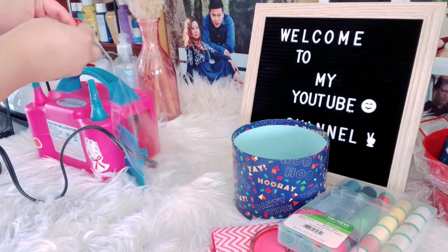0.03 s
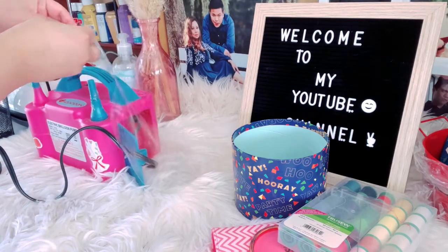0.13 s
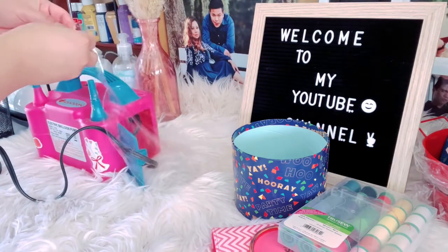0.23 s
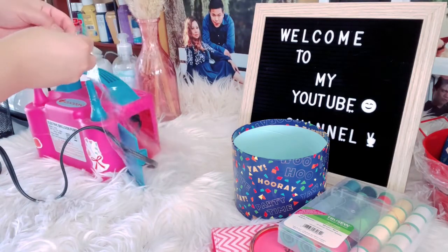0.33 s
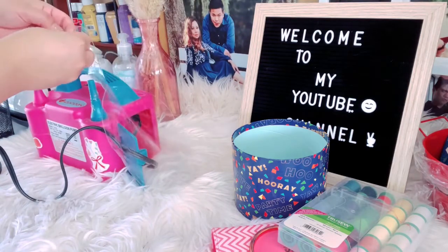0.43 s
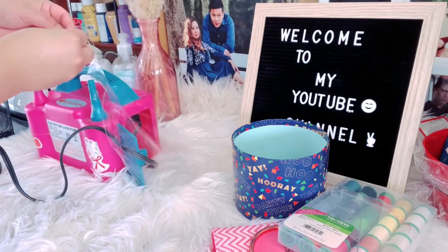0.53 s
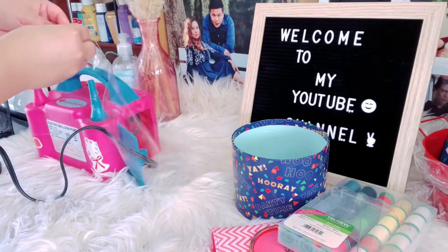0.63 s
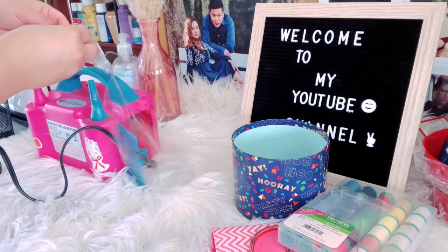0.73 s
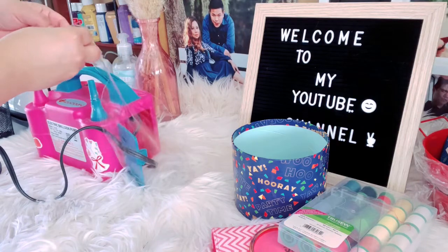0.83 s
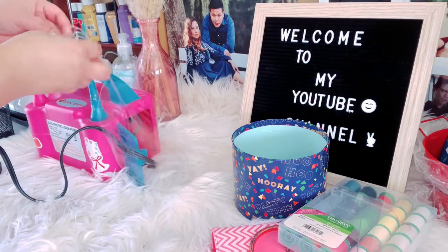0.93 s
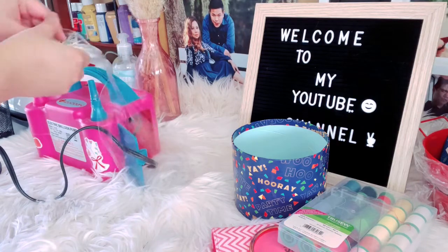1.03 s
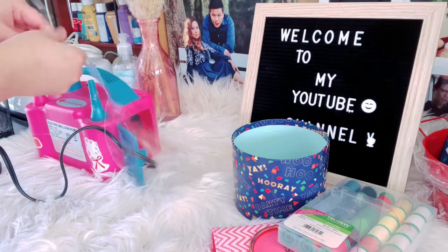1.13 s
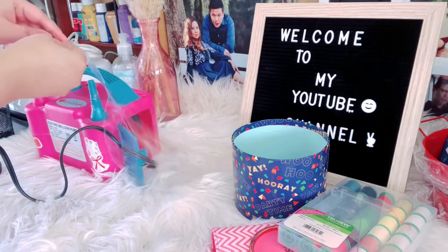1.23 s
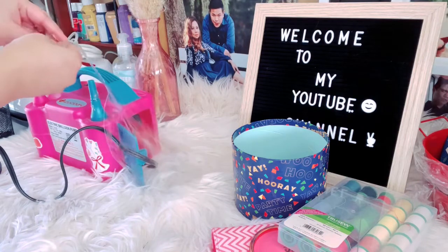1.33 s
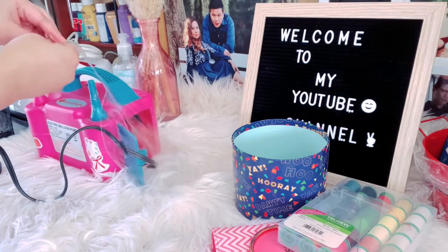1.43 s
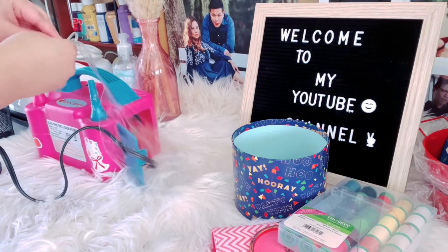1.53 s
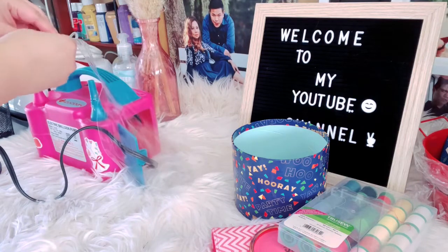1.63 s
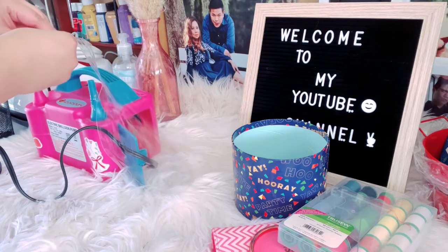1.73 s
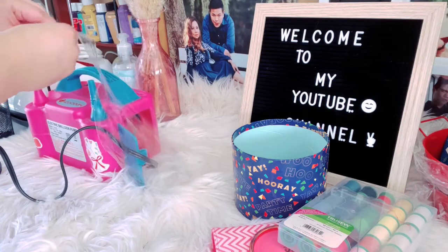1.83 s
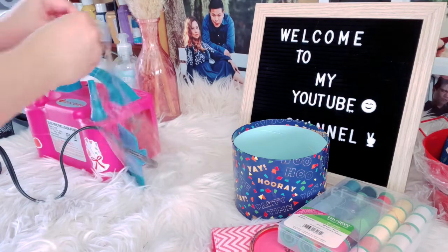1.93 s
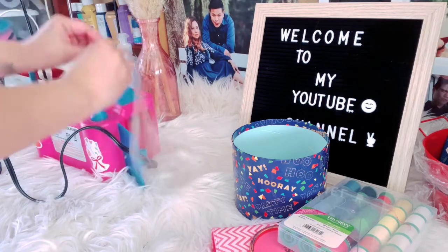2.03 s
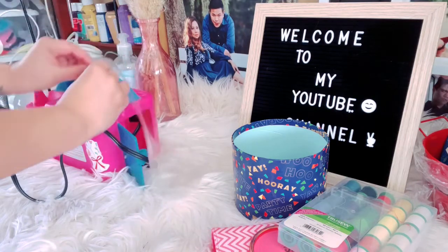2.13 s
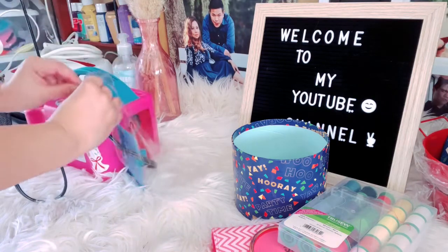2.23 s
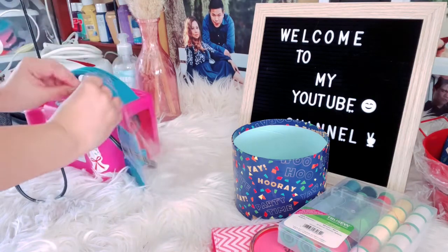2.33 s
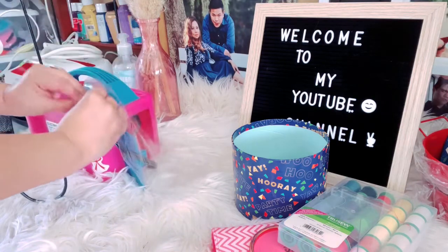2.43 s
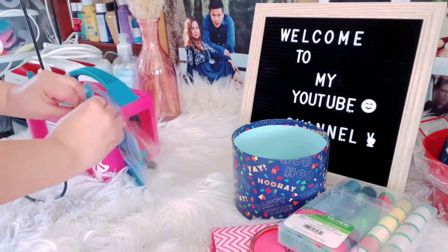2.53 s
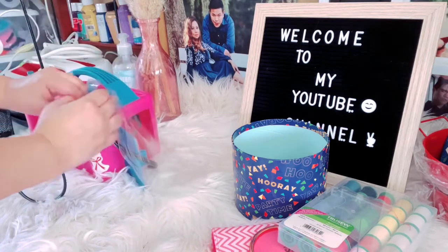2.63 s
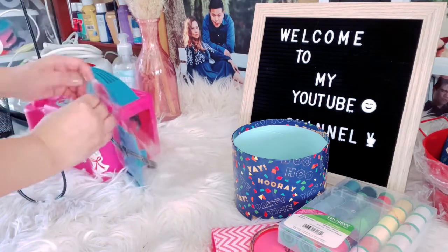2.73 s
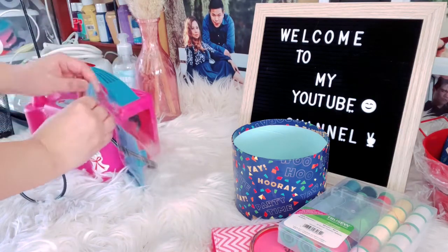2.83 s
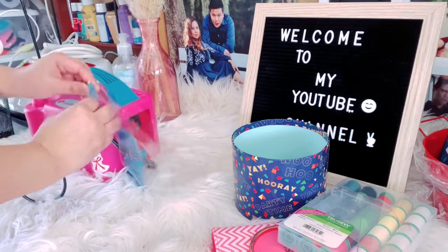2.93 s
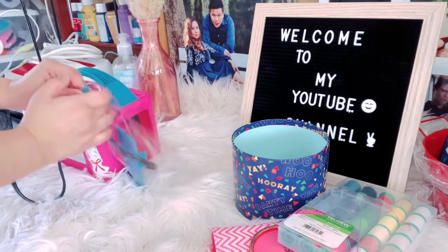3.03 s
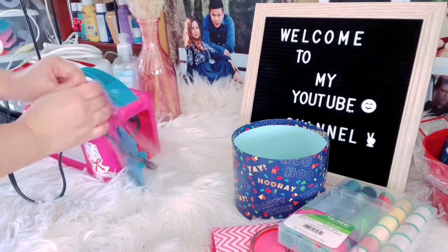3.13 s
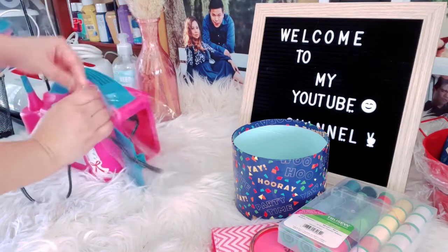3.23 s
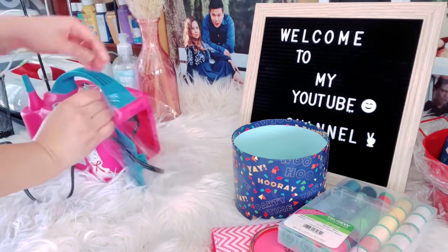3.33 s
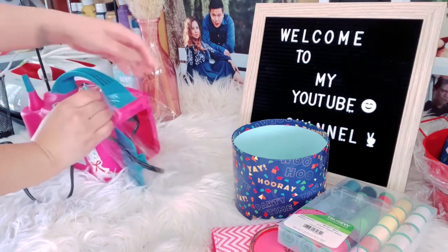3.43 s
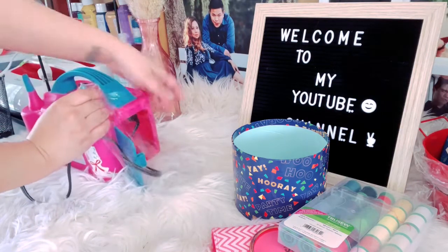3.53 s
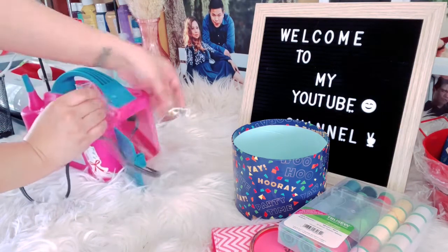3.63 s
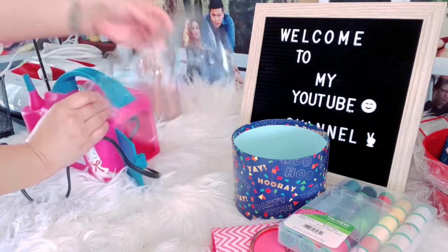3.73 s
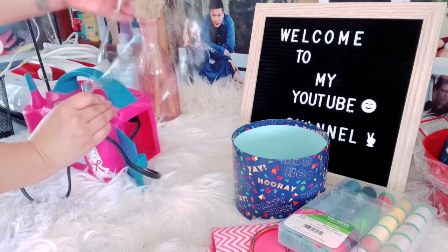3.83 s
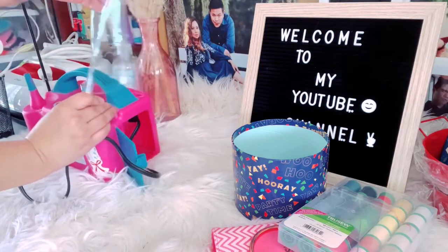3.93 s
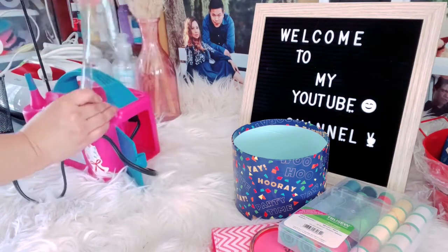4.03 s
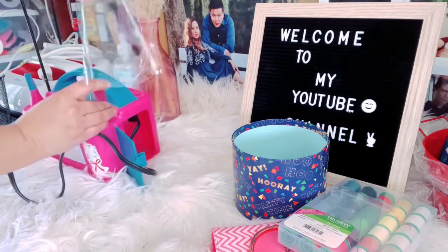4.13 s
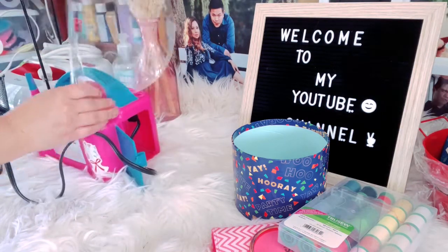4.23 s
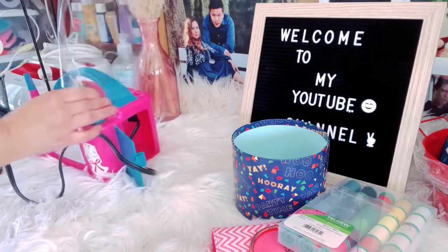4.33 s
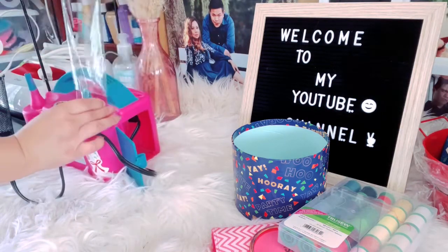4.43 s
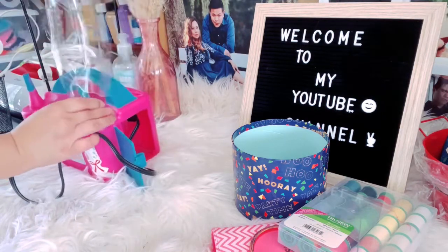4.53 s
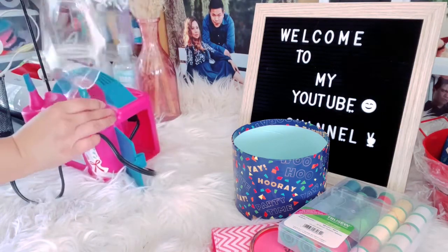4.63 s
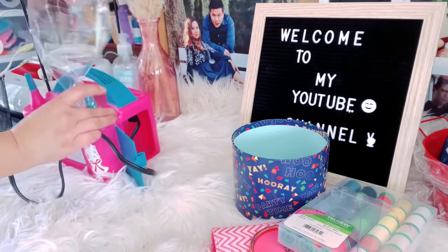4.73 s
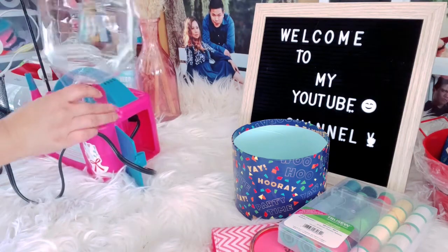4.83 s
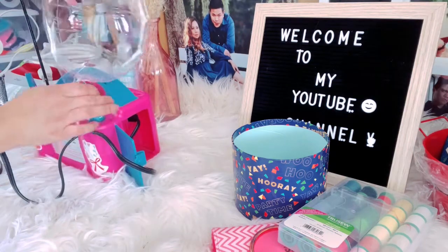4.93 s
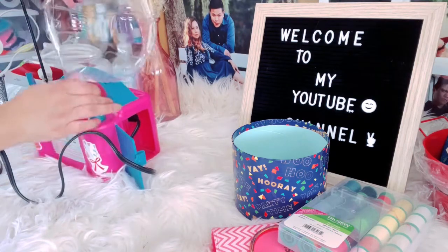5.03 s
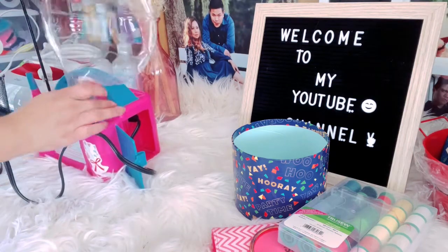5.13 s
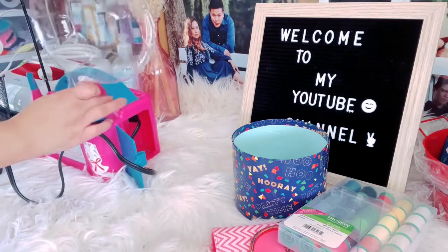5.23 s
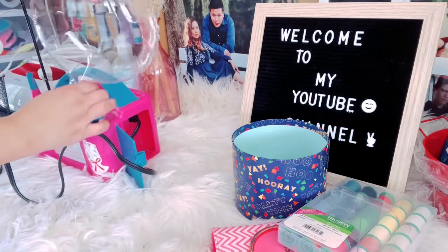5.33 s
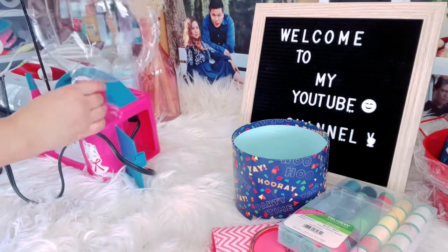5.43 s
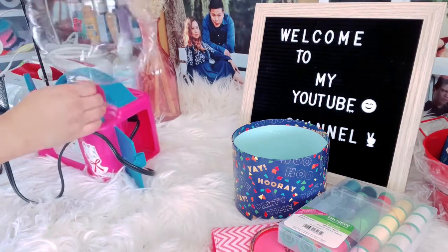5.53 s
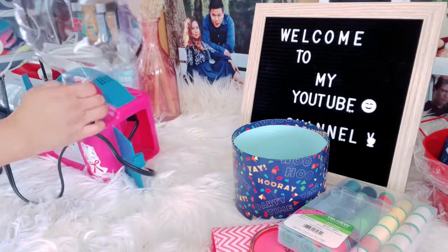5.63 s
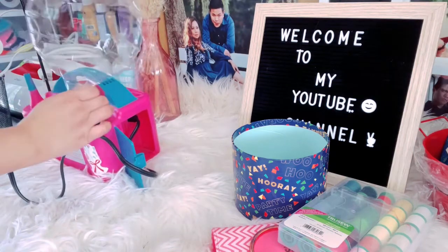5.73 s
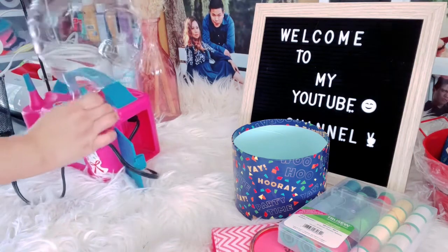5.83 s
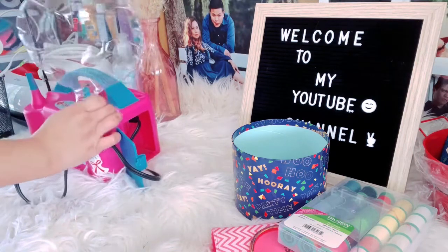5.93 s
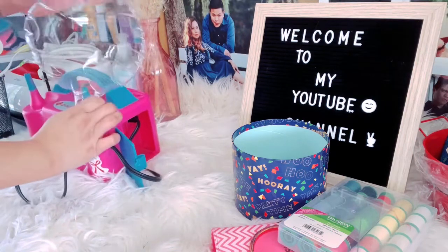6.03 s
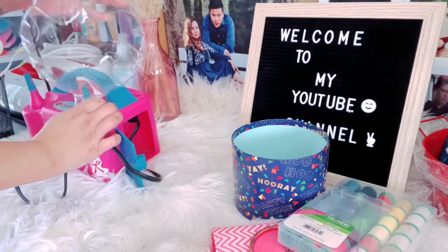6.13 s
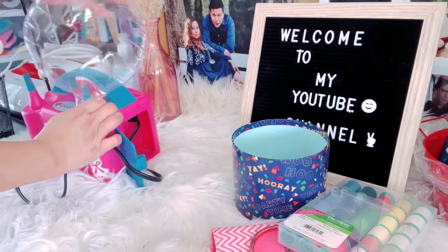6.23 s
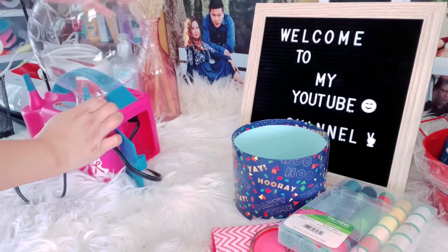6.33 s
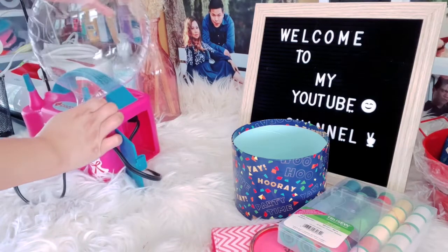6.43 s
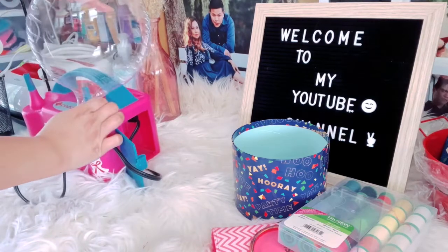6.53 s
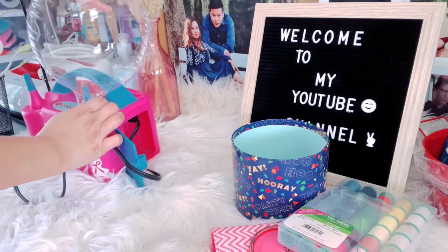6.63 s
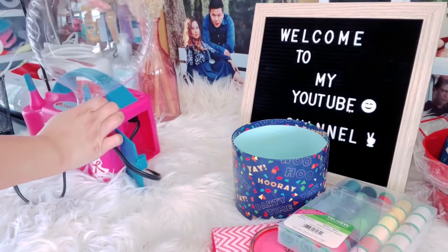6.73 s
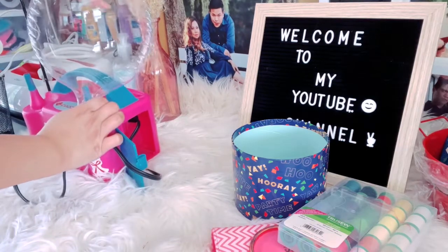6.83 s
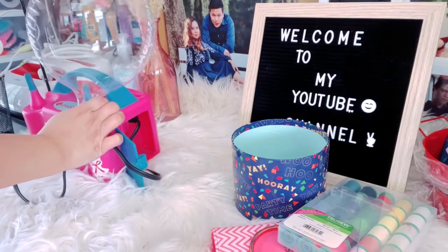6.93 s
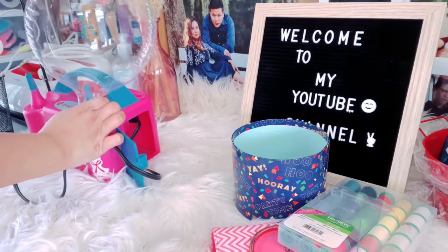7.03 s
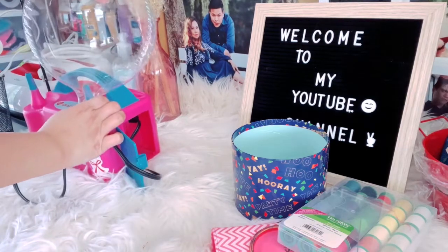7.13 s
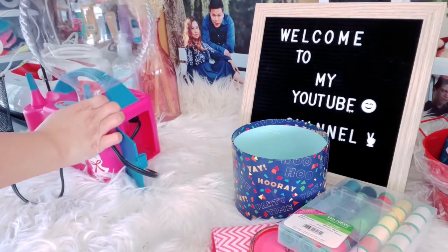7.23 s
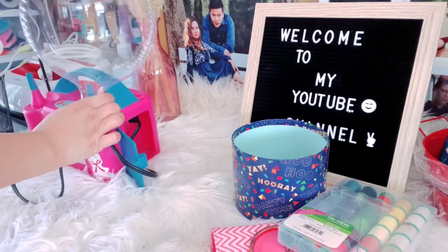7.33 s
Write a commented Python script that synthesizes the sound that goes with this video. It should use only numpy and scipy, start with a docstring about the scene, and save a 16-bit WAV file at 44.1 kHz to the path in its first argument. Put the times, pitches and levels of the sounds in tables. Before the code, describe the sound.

A small electric balloon pump in a furnished room, heard close in stereo with short reverberation. From 0 to about 3.2 s it is quiet: a dry, rustling fan whirr falls in pitch and fades over a low air murmur. Plastic film gives a knock at 0.3 s, a few ticks and a bright crack at 1.8, then dense crinkling and rubbing from 2.1, busiest around 2.4 to 2.7. At 3.25 a hard switch clack launches the motor: a whine sweeps up steeply with electrical buzz, whistling blades and roaring, hissing air, while the limp balloon flaps until about 4. Released at 3.6, it sags; short presses at 3.9 and 4.5 push it up again, with extra hiss leaking afterwards. From 4.7 whine and roar sink steadily. At 6.15 a long press revs it up to its highest, loudest rush, released around 7.2 as it begins falling.

```python
"""A falling whirr is heard first: the fan of a small electric balloon pump running out on a table in a furnished room.
Fingers crinkle a clear plastic balloon on the nozzle, its film snapping and rubbing, close to a two-port microphone.
Four presses then drive the motor: torque under current spins the rotor up, fan drag and friction slow it in between.
Whine, blade whistle and commutator tones are sines locked to the speed; air roars through the housing's resonances
and hisses past the balloon's neck as noise that grows as a power of the speed."""
import sys
import numpy as np
from scipy import signal
from scipy.fft import rfft, irfft, next_fast_len
from scipy.io import wavfile
from scipy.ndimage import uniform_filter1d

SR = 44100
rng = np.random.default_rng(int(sys.argv[2]) if len(sys.argv) > 2 else 0)


def master(y):
    """Save y as 16-bit WAV."""
    cut = np.clip(np.atleast_2d(y).T, -1, 1)
    pcm = np.round(cut * 32767)  # scale
    wavfile.write(sys.argv[1], SR, pcm.astype(np.int16))


N = 325458
TIME = np.arange(N) / SR
BINS = np.fft.rfftfreq(1024, 1 / SR)

# The switch is held down: (start t/s, stop t/s, acceleration by the motor at stall/turns per s^2)
PRESSES = [(3.26, 3.635, 10221), (3.87, 4.015, 10197), (4.502, 4.665, 10014), (6.162, 7.207, 10470)]
START_SPEED = 88  # turns/s left from an earlier run
HALF_CURRENT_SPEED = 226  # turns/s at which the current has halved
FRICTION = 65  # turns/s lost each second in brushes and bearings
WORK_SPEED, FAN_DRAG, DRAG_POWER = 500, 245, 2.61  # turns/s, its fan loss in turns/s each second, exponent

# The rotor's once-a-turn whine as the case radiates it: (f/Hz, level/dB)
WHINE = [(150, -46), (265, -34.5), (320, -38.5), (400, -33.5), (450, -31), (485, -30.5), (503, -34),
         (522, -29.5), (570, -33.5), (588, -33), (612, -29), (633, -31.5), (645, -32.5), (658, -26),
         (682, -21)]
# Brief dips of the whine: (start t/s, stop t/s, level change/dB)
WHINE_DIPS = [(4.09, 4.28, -4), (4.57, 4.92, -11), (6.263, 6.59, -2)]
# The rotor's third harmonic as it crosses the case's main resonance: (f/Hz, level/dB)
THIRD_HARMONIC = [(600, -46), (780, -44.5), (930, -43), (1020, -79), (1200, -76), (1330, -55),
                  (1480, -52.5), (2000, -66)]
# Whistle of the seven fan blades as the vents pass it: (f/Hz, level/dB)
BLADES = [(400, -86), (480, -74), (508, -61), (545, -65), (580, -59), (620, -59), (1830, -65), (1940, -56),
          (2010, -52), (2070, -63), (2125, -52.5), (2200, -49), (2300, -61), (2420, -54), (2520, -63),
          (2620, -58), (2720, -68), (2900, -60), (3020, -40), (3200, -43), (3400, -50), (3550, -48),
          (3760, -41.5), (4000, -47.5), (4300, -46.5), (4550, -46), (4750, -44.5)]
BLADE_JITTER = .006  # share by which turbulence shakes the whistle's pitch at working speed
# Commutator tones at stall current, before the sparking level: (multiple of the speed, level/dB)
BRUSH_TONES = [(12, -34), (24, -40), (36, -51), (48, -56)]
# Radiation of the commutator tones by the plastic case: (f/Hz, relative level/dB)
CASE_RADIATION = [(700, -10), (1300, -17), (2000, -3), (2400, -20), (3050, 0), (3400, -10), (4050, 6.5),
                  (4330, -4), (4560, 2), (4900, -11), (5300, -7), (5550, 4), (5750, 5.5), (5950, -6),
                  (6500, -20), (14000, -26)]
HUM_HZ, HUM_DB = 120, -28  # twice the mains frequency; level at stall current

# Laws of air noise: (level/dB at working speed, growth/dB per tenfold speed)
ROAR_LAW = (-29, 36.2)
RUMBLE_LAW = (-40, 26.5)
JET_LAW = (-41, 56)
SPRAY_LAW = (-40, 55.3)
NECK_LAW = (-56, 41)
NOZZLE_LAW = (-51, 38)
# Air resonances in the housing: (f/Hz, width/Hz, level/dB)
HOUSING = [(419, 52, -4), (542.6, 39, 6), (675, 180, -3), (733, 52, -1), (977, 60, 0), (1048.6, 36, -3.5),
           (1392, 27, -13.5)]
# Vent resonances, over the plain hiss: (f/Hz, width/Hz, level/dB)
VENTS = [(1960, 120, -1.5), (2254, 41, -1.5), (3054, 70, 4), (3400, 240, -3)]
# Nozzle tube resonances, which stand out once the jet slackens: (f/Hz, width/Hz, level/dB)
NOZZLE = [(5000, 92, -0.5), (6700, 240, -4.5)]
# Resonances of the balloon's neck: (f/Hz, width/Hz, level/dB)
NECK = [(4650, 1000, 5.5), (5240, 680, 10.5), (6260, 350, -22)]
# Spectral shapes of the rumble, the jet and its fine spray: (f/Hz, relative level/dB)
RUMBLE = [(20, -32), (45, -39), (78, -1), (200, 6.5), (400, -1), (600, -66), (1200, -58), (4000, -70)]
JET = [(300, -2.5), (1000, 1), (2700, 4), (3400, 5.5), (6000, 2), (8000, -3.5), (10000, -44), (14000, -25),
       (15000, -48)]
SPRAY = [(3000, -48), (6000, 6), (8500, 5.5), (12000, 5), (13000, 10.5), (14200, 5), (14700, -20),
         (15000, -60)]
# Air flow through the fan, lowered as the filling balloon pushes back: (t/s, level/dB)
THROUGHFLOW = [(3.4, 3.5), (4.03, 2.5), (4.7, -1.5), (6.7, -0.5), (7.2, -6)]
# The grip changes and more or less air escapes past the neck:
# (start t/s, stop t/s, ramp/s, extra jet level/dB, extra spray level/dB, extra neck level/dB)
LEAKS = [(3.284, 3.538, .02, 5.5, 3, 13), (4.172, 4.415, 0.036, 6.5, 5, 18),
         (4.558, 4.854, 0.068, 2.5, 5, 7), (4.837, 5.183, 0.18, 4, 2, 6),
         (6.164, 6.404, 0.09, -0.5, -1, -11), (7.174, 7.4, 0.017, 0.5, 4, 9)]
# The limp balloon flaps open and puffs the air in the housing: (t/s, level/dB)
FLAPS = [(3.672, -17), (3.724, -22), (3.772, -16), (3.96, -15), (4.013, -26)]
FLAP_S = 0.0055  # rise constant of one puff
# The slack balloon buffets the air until it has unfolded
BUFFET_START_S, BUFFET_STOP_S, BUFFET_DB = 3.36, 4.05, -41.5
BUFFET_HZ, BUFFET_WIDTH_HZ = 98, 22

# Spectral shape of the bearings' rustle: (f/Hz, relative level/dB)
RUSTLE = [(60, -10), (150, 4), (320, -2.5), (600, 2.5), (1000, -9), (1600, -14.5), (3500, -20), (3900, -26),
          (4300, -19), (9000, -21.5), (12500, -18), (15000, -25)]
# Resonances rung by the dry bearings until the rotor has almost stopped: (f/Hz, width/Hz, level/dB)
BEARING_RINGS = [(1320, 150, 2), (2100, 250, 1), (2820, 400, 0)]
# Law of the bearing rings: (level/dB at the starting speed, power of the speed)
BEARING_LAW = (-75, 0.74)
# Commutator bars sliding without current: (multiple of the speed, level/dB before band-pass and slowing)
DRY_TONES = [(12, -78), (24, -81), (36, -84), (48, -84), (60, -85), (72, -84), (84, -86), (96, -85),
             (120, -85)]
SING_HZ, SING_WIDTH_HZ, SING_DB = 3830, 110, -69  # the case sings while the rotor is still fast

# Crinkles of the film, before the common gains in film():
# (t/s, knock level/dB, knock f/Hz, crack level/dB, crack f/Hz)
CRINKLES = [(0.304, -52, 900, -64, 4900), (1.116, -65, 1300, -71, 2400), (1.165, -74, 1300, -76, 5500),
            (1.812, -72, 1500, -51.5, 5400), (2.104, -69, 1300, -77, 3600), (2.174, -61, 1160, -73, 3600),
            (2.213, -65, 1090, -64, 3700), (2.384, -59.5, 1040, -58.5, 3630),
            (2.43, -58, 1720, -50.5, 3760), (2.478, -65, 1100, -59, 3300), (2.518, -55.5, 560, -62, 4500),
            (2.532, -65, 850, -68, 5400), (2.581, -61, 1700, -60, 2700), (2.607, -59, 1130, -55.5, 5900),
            (2.649, -52, 890, -61, 2100), (2.661, -66, 1310, -64, 4200), (2.681, -56, 900, -57, 2900),
            (2.719, -57, 1180, -60, 2200), (2.845, -75, 1410, -67, 4830), (2.918, -64, 1420, -65, 3500),
            (2.962, -66, 1700, -56.5, 3020), (3.004, -59.5, 1120, -76, 5500), (3.14, -82, 1400, -66, 5000),
            (3.174, -64, 1510, -52, 4470), (3.24, -53, 1500, -51, 3500)]
# Short strokes of the film rubbing on the nozzle: (start t/s, stop t/s, level/dB)
RUBS = [(0.2, 0.285, -68.5), (1.112, 1.177, -71), (1.45, 1.482, -74), (2.067, 2.157, -71),
        (2.18, 2.255, -68.5), (2.4, 2.495, -68), (2.51, 2.8, -72), (2.95, 3.033, -67.5), (3.064, 3.18, -70),
        (3.193, 3.267, -63.5)]
GRAINS_PER_S, CLUMP_DB, CLUMP_HZ = 3500, 4.5, 35  # tiny slips of the film; depth and rate of their clumping
# Knocks of the switch and the starting rotor: (t/s, level/dB)
SNAPS = [(3.242, -39), (3.254, -22), (3.262, -33), (6.165, -42)]
# Modes of the case: (f/Hz, level/dB, 60 dB decay time/s)
CASE_MODES = [(775, 5.5, 0.021), (800, -8, 0.02), (1120, -10, 0.027), (1970, -26, 0.02)]

# Reverberation time of the room: (f/Hz, 60 dB decay time/s)
ROOM_T60 = [(100, 0.098), (1000, 0.32), (5000, 0.29), (15000, 0.13)]
# Spectral shape of the room's murmur of air: (f/Hz, relative level/dB)
ROOM_TONE = [(25, -7.5), (135, -3.5), (205, -6.5), (270, -2), (550, -13), (720, -16.5), (1300, -35.5),
             (3000, -42), (15000, -53)]
ROOM_TONE_DB = -60
# The two microphone ports: (f/Hz, likeness 0-1, left lead/rad, left minus right level/dB)
PORTS = [(101, 0.95, 0.084, 1.5), (280, 0.84, 0.091, 2.5), (583, 0.61, 1.45, 3), (755, 0.12, 0.89, 4),
         (1150, 0.86, 0.33, 5.5), (1380, 0.63, 0.31, 0), (2060, 0.2, 0.94, -0.5), (2720, 0.41, 0.78, -1.5),
         (4500, 0, 0.73, -3), (8760, 0.64, 3.72, -.5), (11900, 0.93, 6.6, 0), (11770, 0.85, 46.4, -0.5),
         (13950, 0.6, 2.2, 0)]
EDGE_HZ = 15700  # upper band limit


def rotor():
    """Angular momentum balance: torque goes with current squared; fan drag and friction oppose it (turns/s)."""
    pull = sum(strength * gate(start, stop, ramp_s=.002) for start, stop, strength in PRESSES)
    step, speed, speeds = 64, START_SPEED, []
    for torque in pull[::step].tolist():
        drag = FRICTION + FAN_DRAG * (speed / WORK_SPEED) ** DRAG_POWER
        drive = torque / (1 + speed / HALF_CURRENT_SPEED) ** 2
        speed = max(speed + (drive - drag) * step / SR, 0)
        speeds.append(speed)
    return np.interp(TIME, TIME[::step], speeds)


def motor(speed, first_start_db=-1, restart_db=-9.0):
    """Rotational sources: whine and whistle are harmonics of the speed; hum and brush tones follow the current."""
    speed = speed * (1 + 0.001 * wander(10.9))
    flow, hum = current(speed)
    # the brushes sing loudest on a start from rest
    spark_db = np.where(TIME < PRESSES[1][0], first_start_db, restart_db)
    pulsing = 1 + 0.32 * np.sin(2 * np.pi * HUM_HZ * TIME)  # twice a mains cycle
    sparking = flow * amp(spark_db) * pulsing
    near = shelves(blade_whistle(speed, flow) + brush_tones(speed) * sparking, echo_db=-6)
    return running() * rotor_whine(speed) + near + hum


def rotor_whine(speed):
    """Once-per-turn excitation and its third harmonic, weighted by the case's radiation at each pitch."""
    dips = sum(db * gate(start, stop, ramp_s=0.051) for start, stop, db in WHINE_DIPS)
    whine = amp(read(WHINE, speed) + dips) * tone(speed, rough=0.23, flutter_hz=30.7, lean_db=6.0)
    hz = 3 * speed
    third = amp(read(THIRD_HARMONIC, hz)) * tone(hz, rough=0.25, flutter_hz=30, lean_db=-1.5)
    return whine + third


def blade_whistle(speed, flow):
    """Blade-passing tone: seven pulses a turn, with turbulence shaking the pitch in proportion to speed."""
    hz = 7 * speed
    shaken = hz * (1 + BLADE_JITTER * speed / WORK_SPEED * wander(126))
    rough = .55 * np.clip(speed / WORK_SPEED, .6, 1)
    blades = amp(read(BLADES, hz)) * tone(shaken, rough=rough, flutter_hz=32, lean_db=1)
    blades = blades * np.clip(speed / 60, 0, 1) ** 2  # silent near rest
    return blades * amp(-25 * flow * (hz < 2700))  # the low whistle thins while the rotor races up


def brush_tones(speed, fizz_db=-43):
    """Commutation: brushes crossing the bars excite multiples of the speed, and sparks fizz around them."""
    brushes = amp(fizz_db) * unit(band(rng.standard_normal((2, N)), 900, 3500))
    for order, db in BRUSH_TONES:
        hz = round(order) * speed
        gain = amp(db + read(CASE_RADIATION, hz))
        brushes = brushes + gain * tone(hz, rough=.55, flutter_hz=200, lean_db=-2)
    return brushes


def current(speed, hum_power=1.56):
    """Back-EMF: the relative current falls as the rotor gains speed; also returns the hum the current makes."""
    held = sum(gate(start, stop, ramp_s=0.032) for start, stop, _ in PRESSES)
    draw = 1 / (1 + speed / HALF_CURRENT_SPEED)
    hum = tone(np.full(N, HUM_HZ), rough=.15, flutter_hz=20, lean_db=2)
    return held * draw, amp(HUM_DB) * held * draw ** hum_power * hum


def running(open_s=0.062):
    """Onset gate: opens as the motor first starts and stays open."""
    return np.clip((TIME - PRESSES[0][0]) / open_s, 0, 1)


def shelves(x, echo_db=-1, fall_s=0.011):
    """Early reflection: a dense cluster of echoes from things close by breaks up and smears gliding tones."""
    t = np.arange(SR // 16) / SR
    hits = rng.random((2, len(t))) < 1500 / SR
    taps = rng.standard_normal((2, len(t))) * hits * np.exp(-t / fall_s)
    taps = taps / np.linalg.norm(taps, axis=1, keepdims=True)
    echoes = signal.fftconvolve(x, taps, axes=1)[:, :N]
    return (x + amp(echo_db) * echoes) / np.sqrt(1 + amp(echo_db) ** 2)


def air(speed, sputter_db=1.0, vents_db=-21):
    """Aeroacoustic noise: churning air rings the cavities and the escaping jet hisses, all growing with speed."""
    churn = grown(ROAR_LAW, speed) * amp(curve(THROUGHFLOW))
    roar = noise(np.sqrt(peaks(HOUSING)), patchy_db=1.7) * churn + flaps()
    rumble = noise(amp(read(RUMBLE, BINS)), patchy_db=0.1) * grown(RUMBLE_LAW, speed)
    rumble = rumble * amp(0.11 * curve(THROUGHFLOW))
    # the churn also leaves by the vents
    vents = noise(np.sqrt(peaks(VENTS)), patchy_db=4) * churn * amp(vents_db)
    nozzle = noise(np.sqrt(peaks(NOZZLE)), patchy_db=2.5) * grown(NOZZLE_LAW, speed)
    hiss = neck_hiss(speed) * amp(sputter_db * wander(82))
    return running() * (roar + rumble + buffeting() + vents + nozzle + hiss)


def neck_hiss(speed):
    """Jet noise: air escaping past the balloon's neck radiates broad turbulence and rings the neck."""
    # near reflections ripple the hiss
    ripple = amp(1.2 * unit(uniform_filter1d(rng.standard_normal(len(BINS)), size=3)))
    jet = noise(ripple * amp(read(JET, BINS)) * np.sqrt(1 + peaks(VENTS)), patchy_db=.7)
    spray = noise(amp(read(SPRAY, BINS)), patchy_db=.7)
    neck = noise(np.sqrt(peaks(NECK)), patchy_db=4)
    extra = sum(np.outer(dbs, gate(start, stop, ramp_s)) for start, stop, ramp_s, *dbs in LEAKS)
    jet_db, spray_db, neck_db = extra
    jet = jet * grown(JET_LAW, speed) * amp(jet_db)
    spray = spray * grown(SPRAY_LAW, speed) * amp(spray_db)
    return jet + spray + neck * grown(NECK_LAW, speed) * amp(neck_db)


def grown(law, speed):
    """Power law: gain of a noise whose amplitude grows as a power of the speed."""
    db, db_per_decade = law
    return amp(db) * (speed / WORK_SPEED) ** (db_per_decade / 20)


def flaps():
    """Impulsive cavity excitation: each flap of the limp balloon is a puff that rings the housing's air."""
    out, t = np.zeros(N), np.arange(SR // 16) / SR
    ring = sum(amp(db) * np.exp(-np.pi * width * t) * np.sin(2 * np.pi * hz * t) for hz, width, db in HOUSING)
    ring = ring * (1 - np.exp(-t / FLAP_S))
    for s, db in FLAPS:
        add(out, s, amp(db) * ring / abs(ring).max())
    return out * amp([[2], [-2]])


def buffeting():
    """Flow-induced flutter: the slack balloon shakes at a low pitch in the first rush of air."""
    flutter = noise(np.sqrt(peaks([(BUFFET_HZ, BUFFET_WIDTH_HZ, 0)])), patchy_db=1)
    return amp(BUFFET_DB) * gate(BUFFET_START_S, BUFFET_STOP_S, ramp_s=.15) * flutter


def run_out(speed, rustle_db=-60, rustle_power=1.3, scrape_db=0.5, whirr_db=-72, shudder_db=-57):
    """Friction-driven sound: before the first press the slowing rotor rustles, whirrs and shakes the case."""
    pace = np.minimum(speed / START_SPEED, 1)
    rustle = noise(amp(read(RUSTLE, BINS)), patchy_db=2)
    bearing_db, bearing_power = BEARING_LAW
    bearings = amp(bearing_db) * noise(np.sqrt(peaks(BEARING_RINGS)), patchy_db=5.0) * pace ** bearing_power
    # the same rough spots pass once a turn, so their whirr falls with the speed
    spots = rng.standard_normal(size=160)
    passing = np.interp(np.cumsum(speed) / SR, np.arange(len(spots)) / len(spots), spots, period=1)
    whirr = shelves(band(passing, 1200, 2900)[None])
    bars = np.zeros((2, N))
    for order, db in DRY_TONES:
        slide = tone(round(order) * speed, rough=1.5, flutter_hz=100, lean_db=0)
        bars += amp(db) * slide * amp(3 * wander(7))
    bars = shelves(band(bars, 1100, 3800)) * pace ** 1.5
    sing = amp(SING_DB) * noise(np.sqrt(peaks([(SING_HZ, SING_WIDTH_HZ, 0)])), patchy_db=0) * pace ** 7
    shudder = amp(shudder_db) * noise(np.sqrt(peaks([(165, 54, 0)])), patchy_db=1) * pace ** 4
    scraping = (amp(rustle_db) * rustle + amp(whirr_db) * whirr) * pace ** rustle_power
    return (scraping + bearings + bars + sing + shudder) * (1 - running()) * amp(scrape_db * wander(70))


def film(knock_db=4, crack_db=5.5, knock_s=0.0058, crack_s=0.0028, rise_s=0.0013, ring_db=2):
    """Buckling: each fold of the film snaps with a dull knock and a bright crack at its own pitches, then rubs."""
    out, t = np.zeros((2, N)), np.arange(SR // 10) / SR
    for s, low_db, low_hz, high_db, high_hz in CRINKLES:
        a, b = rng.standard_normal((2, 2, len(t)))
        low_ring = unit(band(a[::-1], .85 * low_hz, 1.15 * low_hz))
        knock = unit(band(a + a[::-1] * 0.28, 280, 1300)) + amp(ring_db) * low_ring
        high_ring = unit(band(b[::-1], .78 * high_hz, 1.22 * high_hz))
        crack = unit(band(b, 3200, 7500) + 0.7 * band(b, 9000, 14000)) + amp(ring_db) * high_ring
        crack_shape = (1 - np.exp(-t / rise_s)) * np.exp(-t / crack_s)
        add(out, s, unit(knock) * np.exp(-t / knock_s) * amp(low_db + knock_db))
        add(out, s, unit(crack) * crack_shape * amp(high_db + crack_db))
    return out + rubbing()


def rubbing(stroke_s=0.058):
    """Stick-slip friction: the film slides on the nozzle in clumps of tiny random slips."""
    slips = rng.standard_normal((2, N)) * (rng.random(N) < GRAINS_PER_S / SR)
    grains = slips * amp(CLUMP_DB * np.minimum(wander(CLUMP_HZ), 2))
    rub = unit(band(grains, 380, 5000) + 0.67 * band(grains, 9300, 14400))
    return rub * sum(amp(db) * gate(start, stop, stroke_s) for start, stop, db in RUBS)


def switch(rise_s=0.0028):
    """Modal ringing: the switch and the kick of the starting rotor knock the case, whose modes decay."""
    out, t = np.zeros(N), np.arange(SR // 8) / SR
    ring = np.zeros(len(t))
    for hz, db, t60 in CASE_MODES:
        ring += amp(db) * np.exp(-np.log(1000) * t / t60) * np.sin(2 * np.pi * hz * t)
    for s, db in SNAPS:
        add(out, s, amp(db) * ring * (1 - np.exp(-t / rise_s)))
    return out * amp([[2], [-2]])


def room(x):
    """Reverberation: sparse reflections of random sign, each band decaying at its own rate."""
    taps = rng.choice([-1., 1.], (2, SR // 2)) * (rng.random((2, SR // 2)) < 2500 / SR)
    taps[:, :130] = 0  # no reflection in the first 3 ms
    hz, t, z = signal.stft(taps, SR, nperseg=256)
    tail = signal.istft(z * amp(-60 * t / read(ROOM_T60, hz)[:, None]), SR)[1]
    return signal.fftconvolve(x, tail / np.linalg.norm(tail[0]), axes=1)[:, :N]


def room_tone():
    """Background noise: a steady low murmur of air with a fixed spectrum."""
    return amp(ROOM_TONE_DB) * noise(amp(read(ROOM_TONE, BINS)), patchy_db=1.0)


def noise(gain, patchy_db):
    """Partial coherence: noise of a given spectrum at two ports; their mean has rms 1."""
    a, b, c, d, patches = rng.standard_normal((5, N // 256 + 5, len(BINS)))
    patches = uniform_filter1d(uniform_filter1d(patches, size=8, axis=0), size=9, axis=1)
    patches = unit(patches)
    same = np.clip(read(PORTS, BINS), 0, 1)
    left = a + 1j * b
    lag = np.exp(-1j * read(PORTS, BINS, axis=2))
    right = (same * left + np.sqrt(1 - same ** 2) * (c + 1j * d)) * lag
    lean = amp(read(PORTS, BINS, axis=3))
    z = np.array([left * lean, right]) / np.sqrt(1 + lean ** 2) * gain * amp(patchy_db * patches)
    x = signal.istft(z.transpose(0, 2, 1), nperseg=1024, noverlap=768)[1][:, :N]
    return x / np.std(x.mean(0))


def tone(hz, rough, flutter_hz, lean_db):
    """Phase accumulation: a sine on a pitch curve at both ports, with a share of random flutter."""
    turn = np.exp(2j * np.pi * np.cumsum(hz) / SR)
    flutter = 1 + rough * (wander(flutter_hz) + 1j * wander(flutter_hz))
    left = amp(lean_db / 2) * np.ones(N)
    right = amp(-lean_db / 2) * np.exp(-1j * read(PORTS, hz, axis=2))
    return np.sqrt(2) * (np.array([left, right]) * turn * flutter).real


def peaks(rows):
    """Resonance: summed power response of a set of steep-sided peaks over BINS."""
    return sum(amp(db) ** 2 / (1 + ((BINS - hz) / width) ** 2) ** 2 for hz, width, db in rows)


def wander(rate_hz):
    """Low-pass random process: slow chance of rms 1, up to about the given rate."""
    size = next_fast_len(N)
    hz = np.fft.rfftfreq(size, 1 / SR)
    return unit(irfft(rfft(rng.standard_normal(size)) / (1 + (hz / rate_hz) ** 4), size)[:N])


def band(x, low_hz, high_hz):
    """Band-pass filtering with gentle slopes."""
    edges = [low_hz, min(high_hz, .45 * SR)]
    return signal.sosfilt(signal.butter(2, edges, "band", fs=SR, output="sos"), x)


def gate(start, stop, ramp_s):
    """Linear envelope: rises to 1 around start and falls back around stop."""
    return np.clip(np.minimum(TIME - start, stop - TIME) / ramp_s + .5, 0, 1)


def amp(db):
    """Level to amplitude ratio."""
    return 10 ** (np.asarray(db) / 20)


def unit(x):
    """Normalisation to rms 1."""
    return x / np.sqrt(np.mean(x ** 2) + 1e-20)


def curve(rows, axis=1):
    """Linear interpolation of one column of a time table at every sample."""
    rows = np.asarray(rows)
    return np.interp(TIME, rows[:, 0], rows[:, axis])


def read(rows, hz, axis=1):
    """Interpolation of one column of a frequency table on a log axis."""
    rows = np.asarray(rows)
    return np.interp(np.log(hz + 1), np.log(rows[:, 0] + 1), rows[:, axis])


def add(mix, s, sound):
    """Superposition: mixes a sound in at time s."""
    part = mix[..., round(s * SR):][..., :sound.shape[-1]]
    part += sound[..., :part.shape[-1]]


def scene(motor_room_db=-11, hands_room_db=-8):
    """Superposition of direct and reflected sound from pump and hands, over the air noise and room murmur."""
    speed = rotor()
    tones = motor(speed)
    hands = film() + switch()
    reflected = room(amp(motor_room_db) * tones + amp(hands_room_db) * hands)
    return tones + hands + reflected + air(speed) + run_out(speed) + room_tone()


def record(dry, low_cut_hz=34):
    """Band limiting: the microphone's bass roll-off and a steep upper edge."""
    thin = signal.sosfilt(signal.butter(2, low_cut_hz, "high", fs=SR, output="sos"), dry)
    edge = signal.firwin(511, EDGE_HZ, window=("kaiser", 9), fs=SR)
    return signal.oaconvolve(thin, edge[None], "same")


dry = scene()
out = record(dry)
master(out)
```